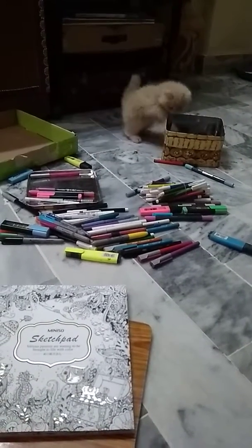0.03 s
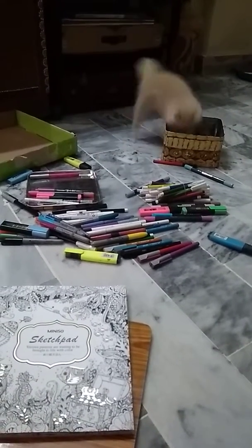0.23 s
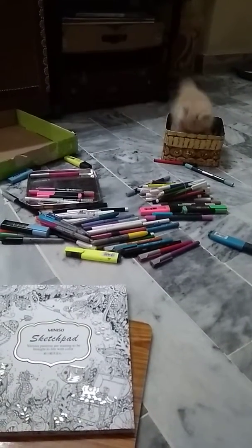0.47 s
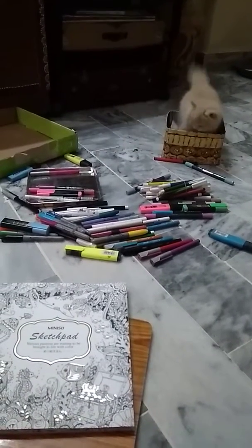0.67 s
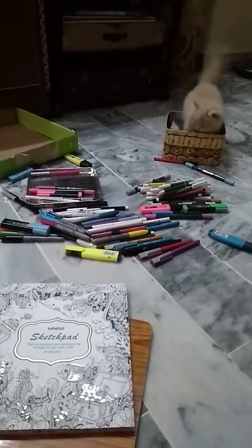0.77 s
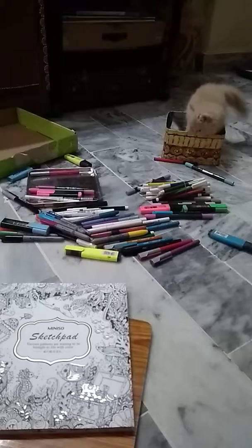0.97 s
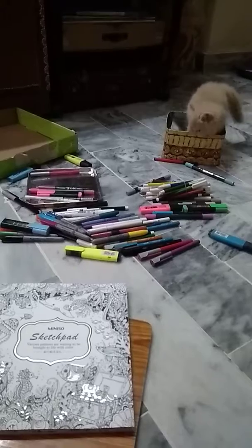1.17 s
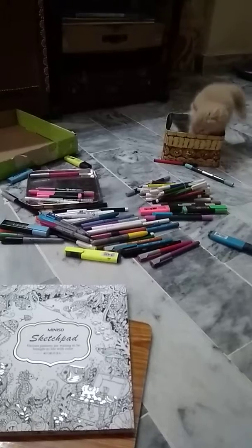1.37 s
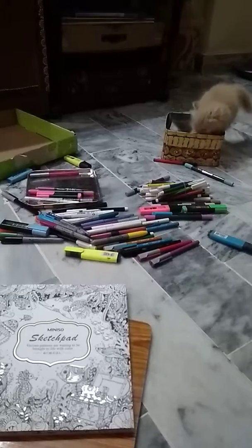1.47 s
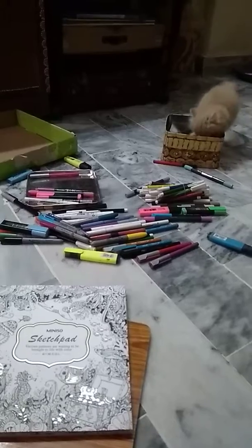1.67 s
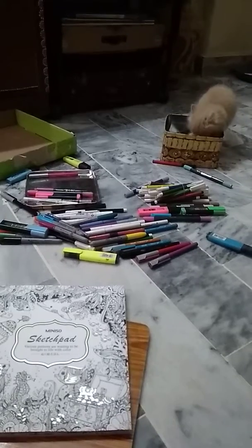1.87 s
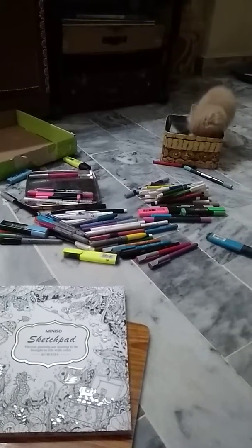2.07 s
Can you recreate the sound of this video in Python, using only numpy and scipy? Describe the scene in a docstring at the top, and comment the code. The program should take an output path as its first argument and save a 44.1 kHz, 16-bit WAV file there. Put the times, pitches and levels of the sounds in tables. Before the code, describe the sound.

Claws rustle and tick against wicker in a hard-floored room. The basket slides and drops back with a hollow knock, then the scratching continues, building to sharp snaps and a thump, with low air puffs mostly on the left microphone.

```python
"""Crisp rustling, scuffs and hollow knocks: a kitten pounces into a small wicker basket and scrabbles.
Claws and fur rake the weave in bursts of tiny clicks, and single strands snap.
The basket scuffs over a tiled floor, tips and knocks back down, and the hard room rings briefly.
Soft, low puffs of air reach the microphones, mostly the left one, over a faint rumble and hiss."""
import sys
import numpy as np
from scipy import signal
from scipy.fft import rfft, irfft
from scipy.io import wavfile
from scipy.ndimage import uniform_filter1d

SR = 44100
rng = np.random.default_rng(int(sys.argv[2]) if len(sys.argv) > 2 else 0)


def pcm_store(signal):
    """Save signal as 16-bit PCM."""
    levels = np.round(np.clip(np.atleast_2d(signal), -1, 1) * 32767)
    wavfile.write(sys.argv[1], SR, levels.astype(np.int16).T)


N = 92610

# Claw strokes. Each row: start in seconds, seconds until the fade, level in dB, woody part's extra gain
# in dB, bright pitch in Hz, treble tilt in dB per octave, strength of the bright peak as a factor.
CLAW_STROKES = [(0.201, 0.031, -52, -29, 9600, -3, 0.57), (0.223, 0.093, -46, -3.5, 9800, -2.5, 1.1),
                (0.311, 0.085, -51, -3.5, 9840, -10, 1.14), (0.456, 0.075, -48.5, -9, 9680, -10.5, 1.026),
                (0.661, 0.022, -64, 0.5, 9200, -2, 0.65), (0.687, 0.048, -51, -11.5, 9440, -3.5, 0.8),
                (0.857, 0.031, -55, -4.5, 8840, 6, 1.6), (0.945, 0.063, -70, 5, 9300, -5, 2.3),
                (1.001, 0.093, -50.5, -12, 9550, -2.5, 0.96), (1.282, 0.031, -67.5, -9, 9900, 7, 0.9),
                (1.376, 0.071, -56.5, -8, 9100, -1.5, 0.99), (1.549, 0.046, -52.5, -10.5, 9500, 4.5, 0.54),
                (1.608, 0.059, -42.5, -13.5, 9800, 1, 1.12), (1.726, 0.023, -54, -42, 9700, 7, 0.55),
                (1.759, 0.025, -41.5, -28, 9540, -1.5, 1.25)]
# Fur rubbing the rim. Each row: start in seconds, seconds until the fade, level in dB.
FUR_RUBS = [(0.751, 0.11, -54), (0.916, 0.14, -65), (1.1, 0.095, -66.5), (1.394, 0.12, -59),
            (1.461, 0.26, -55.5), (1.831, 0.022, -56.5)]
# Snapping strands. Each row: start in seconds, relative level in dB.
STRAND_SNAPS = [(0.211, -60), (0.499, -45), (1.086, -49), (1.6194, -42), (1.6385, -41), (1.652, -34.5),
                (1.748, -51), (1.781, -40), (1.7896, -47), (1.839, -45), (1.855, -42.5)]
# Basket slides. Each row: start in seconds, seconds until the fade, level in dB, pitch in Hz,
# relative width of the band around that pitch.
BASKET_SCUFFS = [(0.203, 0.072, -50, 890, 0.62), (0.212, 0.084, -58.5, 2100, 0.24),
                 (0.342, 0.057, -47.5, 1560, 0.75), (0.346, 0.046, -50, 3300, 0.48),
                 (0.36, 0.034, -54.5, 5120, 0.067), (0.489, 0.11, -61, 960, 1)]
# Knocks on the floor and dull thuds. Each row: start in seconds, relative level in dB.
FLOOR_KNOCKS = [(.37, -63), (.482, -50), (.490, -48), (.511, -56), (1.765, -71)]
DULL_THUDS = [(0.178, -53.5), (.36, -49.5), (0.482, -48), (0.515, -47), (0.929, -49.5), (1.369, -50.5),
              (1.78, -36.5), (1.79, -33)]
# The basket's hollow tones. Each row: pitch in Hz, relative level in dB, relative ring time.
BASKET_TONES = [(303, 3, 0.13), (565, 28, 0.21), (601, 18, 0.21), (730, 12, 0.16), (870, 12.5, 0.27),
                (1030, 4, 0.23)]
# The noise of hitting the floor: its lower and upper edge in Hz.
CRACK_BAND_HZ = [376, 900]
# The tones in a thud. Each row: pitch in Hz, relative level in dB.
THUD_TONES = [(185, 1.5), (225, 8.5), (300, -0.5), (350, -16)]
# Puffs of air. Each row: middle in seconds, rough length in seconds, level in dB, upper edge in Hz,
# left minus right in dB.
AIR_PUFFS = [(0.064, 0.061, -44.5, 85, 16), (0.14, 0.021, -38.5, 71, -2.5), (0.199, 0.036, -36, 90.6, -21),
             (0.366, 0.031, -29.5, 76.3, 2.5), (0.425, 0.021, -41.5, 70, 11), (0.538, 0.034, -27, 71.6, 39),
             (0.614, 0.094, -36.5, 67.4, 7.5), (0.778, 0.013, -32.5, 58.5, 31),
             (.925, 0.053, -27, 81.5, 22), (1.043, 0.071, -37.5, 72, 12.5), (1.216, 0.11, -44.5, 60, 17),
             (1.331, 0.059, -29, 88, 46), (1.369, 0.036, -31.5, 152, 32), (1.411, 0.024, -26.5, 101, 4),
             (1.465, 0.031, -26, 76, 32), (1.552, 0.078, -44.5, 76.4, 8), (1.646, 0.083, -36.5, 91, 9.5),
             (1.788, 0.018, -20, 118, 41), (1.838, 0.022, -28, 63, 16), (1.917, 0.027, -38.5, 95, 10)]
# Tone colours of the sources and the right microphone. Each row: frequency in Hz, relative level in dB.
STRAND_COLOUR = [(1500, -30), (3500, -26), (4700, -25.5), (5400, -17), (7400, -10.5), (8800, -6.5),
                 (9700, -1.5), (10700, -5.5), (12400, -15), (15500, -23.5)]
WOODY_COLOUR = [(300, -16), (700, -1.5), (1300, -6), (2100, 1.5), (2900, 3.5), (4000, -5), (5400, -3),
                (8000, -9.5), (15000, -21.5)]
FUR_COLOUR = [(1500, -17.5), (2800, -11.5), (3700, -17.5), (4700, -29), (5200, -7.5), (7100, -10),
              (8000, -3), (9300, 5.5), (9750, -8.5), (11600, -17), (12400, -9.5), (15500, -17)]
SNAPPING_COLOUR = [(1500, -51), (5500, -55), (7700, -6), (9400, 6), (10800, -4), (12500, -21)]
CRUNCH_COLOUR = [(1000, -0.5), (4400, -28), (6300, 2.5), (8000, 1), (15000, -8)]
AIR_COLOUR = [(25, 0.5), (55, -5), (100, -11), (200, -18), (360, -22), (1000, -30.5), (1700, -35.5),
              (2200, -35), (2800, -44.5), (5500, -53), (7200, -55.5), (8000, -48), (10500, -50),
              (12500, -76)]
RIGHT_MIC_COLOUR = [(3000, -1.5), (6000, 1), (10000, 0.5), (13000, 7.5)]

RAKE_ATTACK_S, CATCHES_PER_S, CATCH_DB = 0.027, 170, 1.1
STRAND_HZ, STRAND_SPACING_HZ, STRAND_RIPPLE_DB = 9700, 130.4, 2.5
ONE_SIDE_SHARE = 0.83  # share of the clicks' power that reaches only one microphone
KNOCK_RING_SCALE, KNOCK_ATTACK_S, CRACK_DECAY_S, CRACK_DB = 0.52, 0.00094, 0.0094, -20
THUD_ATTACK_S, THUD_DECAY_S = 0.00297, 0.0087
PUFF_LOW_HZ, PUFF_STEEPNESS = 21.3, 3.67
AIR_DB, AIR_PAN_DB = -54.5, 5
ROOM_RING_S, ROOM_TREBLE_RING_S = 0.21, 0.28  # time to fade by 60 dB
ROOM_GAP_S, LEFT_LAG_SAMPLES, TOP_HZ = 0.004, 7, 15650
RAKE_ROOM_DB, BODY_ROOM_DB, SNAP_ROOM_DB = -4, -2.5, -15
RAKE_PAN_DB, BODY_PAN_DB = 6, 7.5


def claw_rakes():
    """Claws tick over the strands: a bright, crisp rustle with a lower, woody one beneath."""
    bright, woody = 0, 0
    grip = claw_grip()
    ticks = crackle(per_second=2900, spread_db=2.8) * grip
    wicker = unit(colour(crackle(per_second=3000, spread_db=4) * grip, WOODY_COLOUR))
    for start, length, db, woody_db, hz, tilt_db, strength in CLAW_STROKES:
        push = undb(db) * stroke(start, length, RAKE_ATTACK_S, release=0.025)
        strands = [(f * hz / STRAND_HZ, strength * gain_db + tilt_db * np.log2(f / STRAND_HZ))
                   for f, gain_db in STRAND_COLOUR]
        bright += push * unit(colour(ticks, strand_ripple(strands)))
        woody += push * undb(woody_db) * wicker
    return in_room(bright, RAKE_ROOM_DB, RAKE_PAN_DB) + in_room(woody, BODY_ROOM_DB, BODY_PAN_DB)


def claw_grip():
    """The claws catch and slip, so the rustle flickers quickly."""
    catch_number = (np.arange(N) / SR * CATCHES_PER_S).astype(int)
    steps = rng.standard_normal(N)[catch_number]
    return unit(undb(CATCH_DB * uniform_filter1d(steps, size=40)))


def strand_ripple(points):
    """Each stroke meets other strands, whose ringing adds narrow peaks and dips to the tone colour."""
    ripple_db = STRAND_RIPPLE_DB * rng.standard_normal(256)
    f = STRAND_SPACING_HZ * (1 + np.arange(len(ripple_db)))
    return np.column_stack([f, level_at(f, points) + ripple_db])


def fur_rubs():
    """The kitten's body brushes the rim with a finer, thinner rustle."""
    push = sum(undb(db) * stroke(start, length, RAKE_ATTACK_S, release=0.011)
               for start, length, db in FUR_RUBS)
    rustle = unit(colour(crackle(per_second=4500, spread_db=1), FUR_COLOUR))
    return in_room(push * rustle, RAKE_ROOM_DB, RAKE_PAN_DB)


def strand_snaps():
    """A claw catches a strand and lets it go with a sharp tick."""
    bursts = sum(undb(db + 6) * stroke(start, length=0, attack=0.00046, release=0.0016)
                 for start, db in STRAND_SNAPS)
    hiss = unit(colour(rng.standard_normal(N), SNAPPING_COLOUR))
    return in_room(bursts * hiss, SNAP_ROOM_DB, pan_db=19)


def paw_slap():
    """A paw lands on the rim and crunches many strands at once."""
    crunch = unit(colour(crackle(per_second=4000, spread_db=1), CRUNCH_COLOUR))
    hit = undb(-41.5) * stroke(start=1.763, length=0, attack=10 / SR, release=0.005)
    return in_room(hit * crunch, SNAP_ROOM_DB, RAKE_PAN_DB)


def basket_scuffs():
    """The shoved basket sticks and slips on the floor."""
    out = 0
    for start, length, db, hz, width in BASKET_SCUFFS:
        band = signal.butter(2, [hz / (1 + width / 2), hz * (1 + width / 2)], "band", fs=SR)
        grind = unit(signal.lfilter(*band, crackle(per_second=910, spread_db=2.8)))
        out += undb(db) * grind * stroke(start, length, attack=0.0079, release=0.016)
    return in_room(out, BODY_ROOM_DB, BODY_PAN_DB)


def basket_knocks():
    """The basket drops back on the tiles with a small crack and a short, hollow ring."""
    out = np.zeros(N)
    t = np.arange(int(0.2 * SR)) / SR
    band = signal.butter(2, CRACK_BAND_HZ, "band", fs=SR)
    onset = np.minimum(t / KNOCK_ATTACK_S, 1)  # wicker gives a little on contact
    for start, db in FLOOR_KNOCKS:
        ring = sum(undb(tone_db) * np.sin(2 * np.pi * hz * t) * 1000 ** (-t / (KNOCK_RING_SCALE * fade))
                   for hz, tone_db, fade in BASKET_TONES)
        crack = unit(signal.lfilter(*band, rng.standard_normal(len(t)))) * np.exp(-t / CRACK_DECAY_S)
        knock = ring / abs(ring).max() + undb(CRACK_DB) * crack
        i = int(start * SR)
        out[i:i + len(t)] += undb(db + 17.5) * knock * onset
    return in_room(out, room_db=-3, pan_db=6)


def dull_thuds():
    """Soft blows wake only low tones that die away fast."""
    t = np.arange(N) / SR
    out = 0
    for start, db in DULL_THUDS:
        tones = sum(undb(tone_db) * np.sin(2 * np.pi * hz * (t - start)) for hz, tone_db in THUD_TONES)
        out += undb(db) * tones * stroke(start, THUD_ATTACK_S, THUD_ATTACK_S, THUD_DECAY_S)
    return in_room(out, room_db=-16.5, pan_db=25)


def air_puffs():
    """Short swirls of air thump each microphone on its own."""
    size = 16384
    half = size // 2
    t, f = np.arange(-half, half) / SR, np.fft.rfftfreq(size, 1 / SR)
    low_cut = f ** 2 / (f ** 2 + PUFF_LOW_HZ ** 2)
    out = np.zeros((2, N + size))
    for middle, length, db, top_hz, pan_db in AIR_PUFFS:
        band = low_cut / np.sqrt(1 + (f / top_hz) ** (2 * PUFF_STEEPNESS))
        swell = np.exp(-abs(2 * t / length) ** 1.73 / 2)
        swirl = irfft(rfft(rng.standard_normal((2, size))) * band) * swell
        swirl *= np.linalg.norm(swell) / np.linalg.norm(swirl, axis=1, keepdims=True)
        side_db = np.minimum([[pan_db], [-pan_db]], 0)  # turn the weaker side down
        i = int(middle * SR)
        out[:, i:i + size] += swirl * undb(db + side_db)
    return out[:, half:half + N]


def in_room(x, room_db, pan_db):
    """The tiled room adds a short echo at room_db; the right side is turned down by pan_db."""
    t = np.arange(int(0.6 * SR)) / SR
    low_pass = signal.butter(2, 4000, fs=SR)
    out = []
    for side, lag in zip(np.broadcast_to(x, (2, N)), (LEFT_LAG_SAMPLES, 0)):
        noise = rng.standard_normal(len(t))
        low = signal.lfilter(*low_pass, noise)
        echo = low * 1000 ** (-t / ROOM_RING_S) + (noise - low) * 1000 ** (-t / ROOM_TREBLE_RING_S)
        echo *= t > ROOM_GAP_S
        echo *= undb(room_db) / np.linalg.norm(echo)
        echo[lag] += 1  # the direct sound, a little later on the left
        out.append(signal.fftconvolve(side, echo / np.linalg.norm(echo))[:N])
    return np.array(out) * undb([[0], [-pan_db]])


def room_air():
    """The room rumbles and hisses, quietly and steadily."""
    f = np.fft.rfftfreq(N, 1 / SR)
    noise = rng.standard_normal((2, N)) + 0.68 * rng.standard_normal(N)  # partly shared by both sides
    air = unit(irfft(rfft(noise) * undb(level_at(f, AIR_COLOUR)), N))
    return air * undb(AIR_DB + np.array([[AIR_PAN_DB], [-AIR_PAN_DB]]) / 2)


def crackle(per_second, spread_db):
    """Clicks on the left and right; the weave throws many of them to one side only."""
    shared = clicks(per_second, spread_db)
    separate = np.array([clicks(per_second, spread_db) for _ in range(2)])
    return np.sqrt(1 - ONE_SIDE_SHARE) * shared + np.sqrt(ONE_SIDE_SHARE) * separate


def clicks(per_second, spread_db):
    """Tiny clicks of uneven size at random moments."""
    happens = rng.random(N) < per_second / SR
    size_db = spread_db * np.minimum(rng.exponential(size=N), 5)
    return happens * undb(size_db) * rng.choice([-1, 1], N)


def stroke(start, length, attack, release):
    """A loudness curve that rises from start and begins to fade length seconds later."""
    t = np.arange(N) / SR - start
    return np.clip(t / attack, 0, 1) * np.exp(-np.maximum(t - length, 0) / release)


def colour(x, points):
    """Give a sound the tone colour drawn by (Hz, dB) points."""
    size = 2048
    f = np.fft.rfftfreq(size, 1 / SR)
    cepstrum = irfft(np.log(undb(level_at(f, points))))
    # Folding it in half makes the filter ring only after a click, never before.
    cepstrum[1:size // 2] *= 2
    cepstrum[size // 2 + 1:] = 0
    response = irfft(np.exp(rfft(cepstrum)))
    return signal.fftconvolve(np.atleast_2d(x), response[None], axes=1)[:, :N]


def level_at(f, points):
    """The level in dB at frequencies f, on a curve through (Hz, dB) points."""
    hz, db = np.array(points, float).T
    return np.interp(np.log(np.maximum(f, 1)), np.log(hz), db)


def undb(db):
    """Turn decibels into a gain factor."""
    return 10 ** (np.asarray(db) / 20)


def unit(x):
    """Scale a signal to an average power of one."""
    return x / np.sqrt(np.mean(x ** 2) + 1e-20)


def scene():
    """Kitten, basket and air together, in stereo."""
    kitten = claw_rakes() + fur_rubs() + strand_snaps() + paw_slap()
    basket = basket_scuffs() + basket_knocks() + dull_thuds()
    return kitten + basket + air_puffs() + room_air()


def record(dry):
    """The right microphone is a little brighter; both sides lose the highest treble."""
    mics = np.vstack([dry[0], colour(dry[1], RIGHT_MIC_COLOUR)])
    return signal.sosfilt(signal.ellip(10, 0.2, 70, TOP_HZ, fs=SR, output="sos"), mics)


dry = scene()
out = record(dry)
pcm_store(out)
```